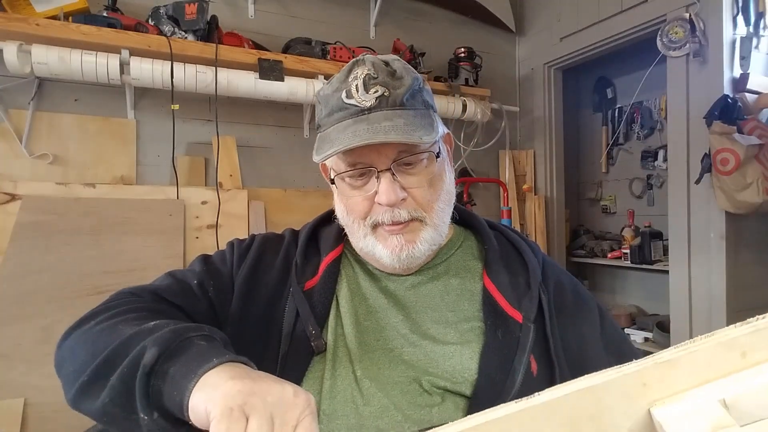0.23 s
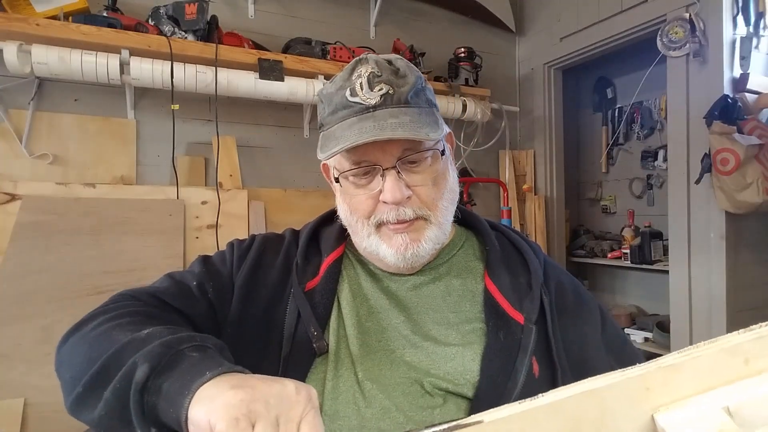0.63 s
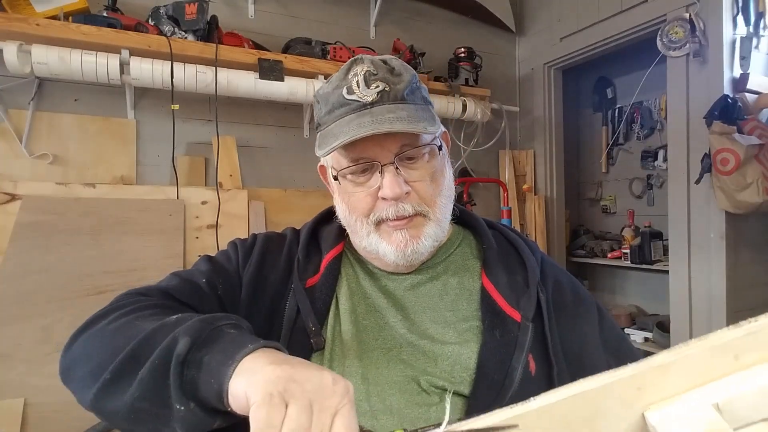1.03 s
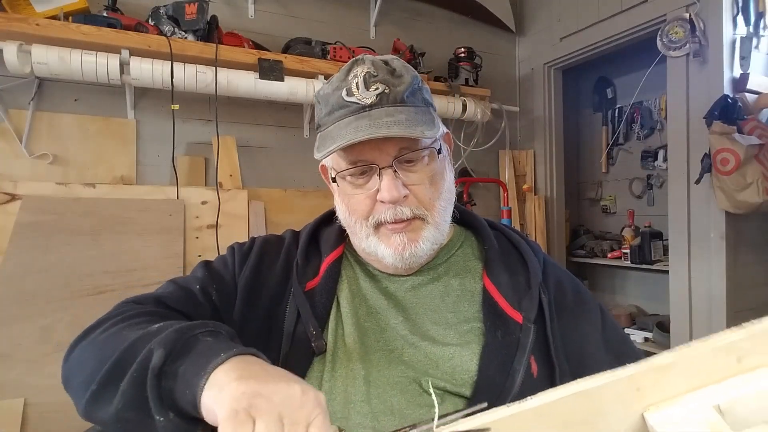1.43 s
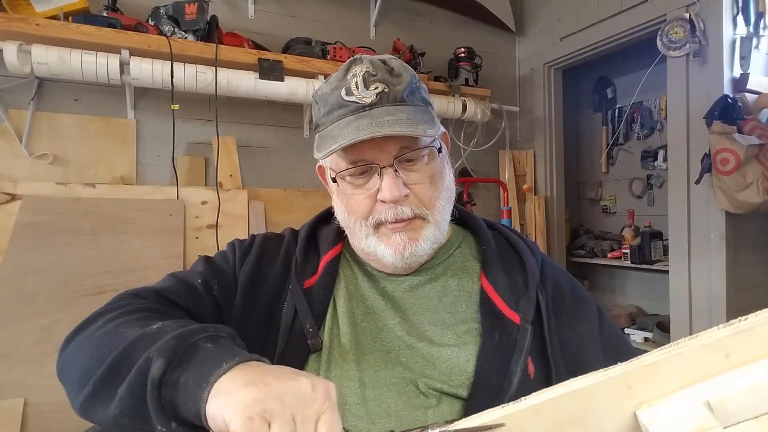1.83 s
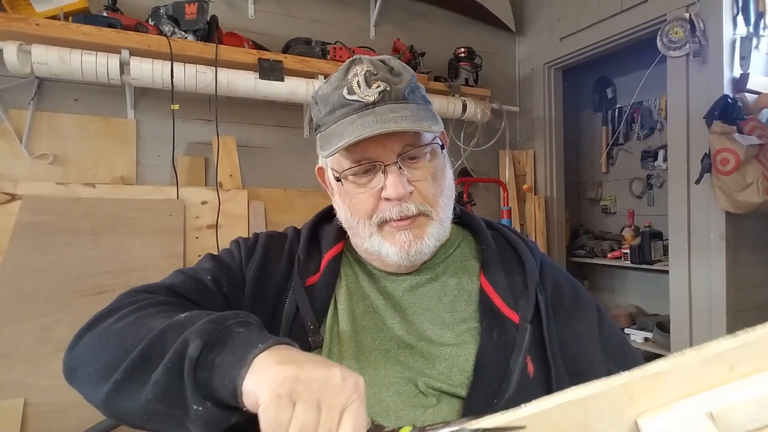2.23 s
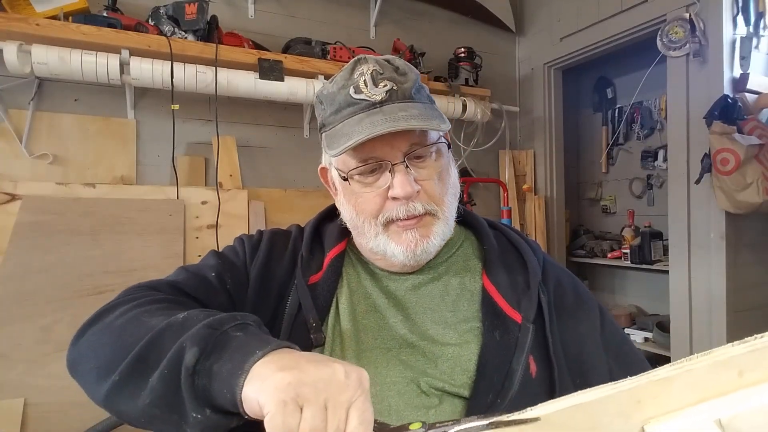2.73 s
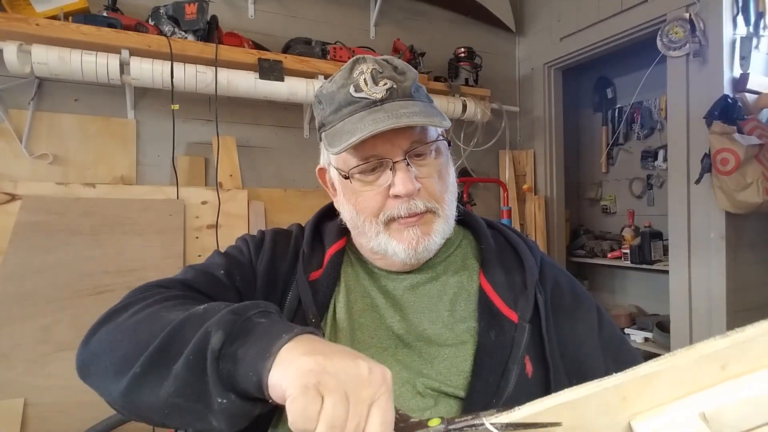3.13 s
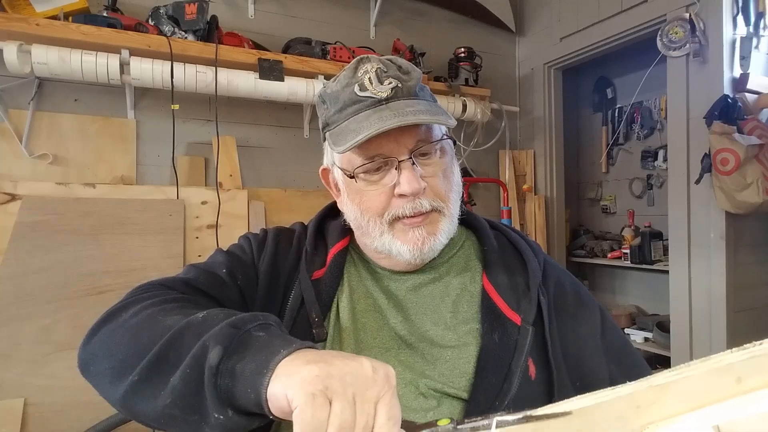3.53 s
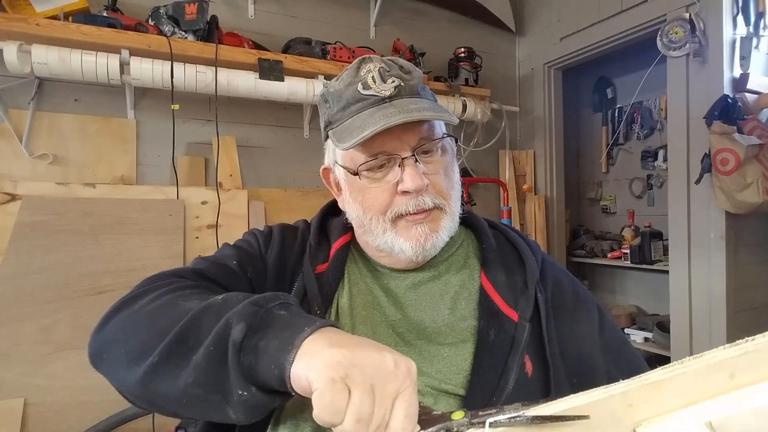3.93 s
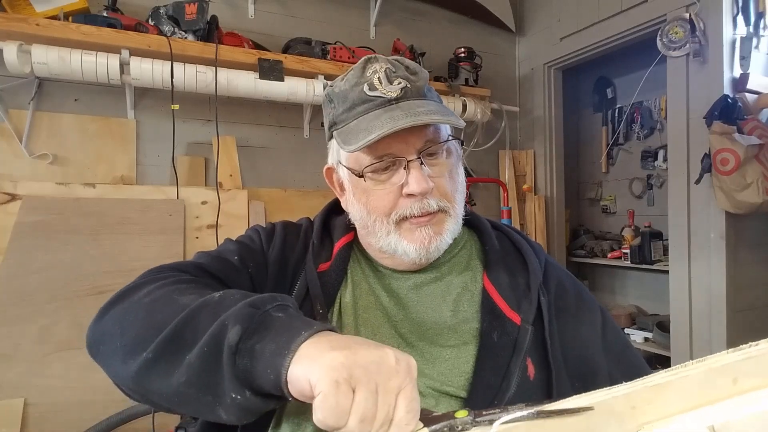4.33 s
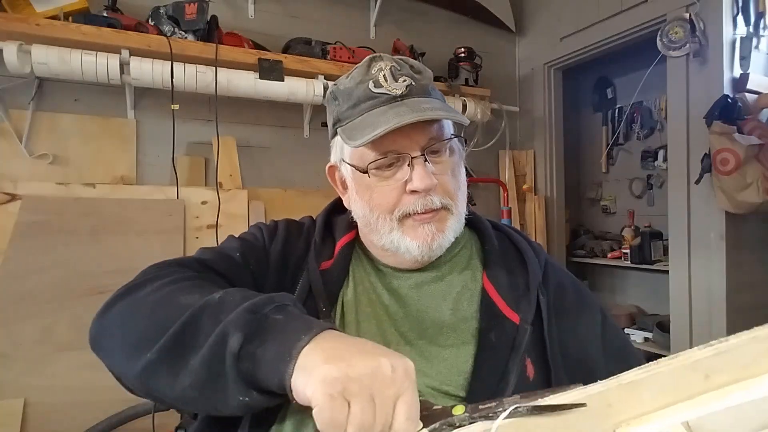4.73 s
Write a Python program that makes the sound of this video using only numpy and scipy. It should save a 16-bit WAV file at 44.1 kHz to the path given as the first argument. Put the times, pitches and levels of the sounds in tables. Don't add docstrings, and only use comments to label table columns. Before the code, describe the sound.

Scissors chew through stiff sandpaper on a wooden board, close to a small camera microphone. Dry, gritty cracks come in uneven clusters, each jolting the board with a short hollow knock. Faint grains scrape between bites, loose paper twangs briefly, blade edges click. After a quieter patch the cutting grows busier and brighter towards the end. A small workshop answers with a short tail over very faint hush.

```python
import sys
import numpy as np
from scipy import signal
from scipy.fft import rfft, irfft, next_fast_len
from scipy.io import wavfile
from scipy.ndimage import uniform_filter1d

SR = 44100
rng = np.random.default_rng(int(sys.argv[2]) if len(sys.argv) > 2 else 0)


def volts_from_db(level):
    exponent = np.asarray(level, float) / 20
    return 10 ** exponent


def unload_wav(signal):
    wavfile.write(
        sys.argv[1],
        SR,
        np.round(np.clip(np.atleast_2d(signal).T, -1, 1) * 32767).astype(np.int16),
    )


N = 219110


def evened(x):
    return x / np.sqrt(np.mean(x ** 2) + 1e-20)


def read(points, hz):
    f, value = np.transpose(points)
    return np.interp(np.log(hz + 1), np.log(f + 1), value)


def add(mix, s, sound):
    part = mix[..., round(s * SR):][..., :sound.shape[-1]]
    part += sound[..., :part.shape[-1]]


def colour(x, points):
    size = next_fast_len(x.shape[-1])
    gain = volts_from_db(read(points, np.fft.rfftfreq(size, 1 / SR)))
    return irfft(rfft(x, size) * gain, size)[..., :x.shape[-1]]


# frequency in Hz, level in dB per Hz.
HUSH_SPECTRUM = [(12, -50), (20, 2), (65, 1.5), (244, 1), (1210, -50), (1390, -69), (2120, -16.5),
                 (12800, -25.5), (15200, -13), (16500, -39)]


def hush(level_db=-63.5, sway_db=1.1):
    shared, own = rng.standard_normal(N), rng.standard_normal((2, N))
    sway = evened(uniform_filter1d(uniform_filter1d(shared, size=5000), size=3000))
    return volts_from_db(level_db + sway_db * sway) * evened(colour(shared + 0.59 * own, HUSH_SPECTRUM))


# frequency in Hz, decay time by 60 dB in seconds.
ROOM_DECAY = [(500, 0.5), (1500, 0.44), (4000, 0.36), (9000, 0.34), (16000, 0.32)]


def room(x, early_db=-18.0, late_db=-3.5):
    taps = np.zeros((len(x), 2, 24000))
    at = np.arange(200, 23900, 12) + rng.integers(0, 12, (len(x), 2, 1975))
    np.put_along_axis(taps, at, rng.choice([-1., 1.], at.shape), 2)
    hz, t, z = signal.stft(taps, SR, nperseg=256)
    decay = volts_from_db(-60 * t / read(ROOM_DECAY, hz)[:, None])
    tail = signal.istft(z * decay, SR, nperseg=256)[1]
    tail *= volts_from_db(late_db) / np.linalg.norm(tail[0, 0])

    echoes = rng.integers(30, 700, (len(x), 2, 8))
    early = np.zeros_like(tail)
    np.put_along_axis(early, echoes, volts_from_db(early_db) * rng.uniform(-2.96, 1, echoes.shape), 2)

    wet = signal.fftconvolve(x[:, None], tail + early, axes=2)[..., :N].sum(0)
    lowpass = signal.butter(1, 1100., fs=SR, output="sos")
    return wet + 0.43 * signal.sosfilt(lowpass, wet[::-1] - wet)


# start in seconds, length in seconds, scrape in the air in dB, scrape in the board in dB.
CRUNCHES = [(0, 0.012, -27.5, -29.5), (0.122, 0.039, -37, -46), (0.43, 0.051, -34, -40),
            (0.536, 0.013, -13.5, -23), (0.884, 0.032, -25.5, -48), (1.627, 0.051, -34.5, -30.5),
            (1.811, 0.015, -19.5, -30), (1.869, 0.078, -22, -30), (1.991, 0.025, -21, -25.5),
            (2.251, .036, -32.5, -38.5), (2.634, 0.04, -18.5, -29.5), (2.71, 0.024, -26, -30.5),
            (2.816, 0.014, -14, -46), (2.864, 0.05, -27.5, -71), (3.393, 0.068, -32, -35.5),
            (3.529, 0.012, -23.5, -31), (3.62, 0.013, -18, -38), (3.765, 0.049, -27.5, -32.5),
            (3.872, 0.032, -35.5, -40), (4.108, 0.028, -37, -60), (4.567, 0.044, -67, -39.5)]
# start in seconds, scrape in the air in dB, scrape in the board in dB.
DRAGS = [(0.364, -42.5, -49), (0.838, -33.5, -44), (0.901, -43, -36.5), (1.152, -44.5, -44.5),
         (1.218, -43.5, -43), (1.385, -42, -52), (1.444, -39.5, -40.5), (1.576, -57, -50),
         (1.917, -39, -43), (2.138, -41.5, -48), (2.468, -52.5, -51), (2.996, -43, -46), (3.082, -37, -41),
         (3.446, -40.5, -42.5), (4.178, -46, -44), (4.357, -31.5, -37), (4.681, -33, -35),
         (4.742, -37.5, -72)]
# frequency in Hz, level in dB per Hz.
PAPER_SPECTRUM = [(300, -7.5), (900, 1.5), (1900, 5), (3500, 2), (7300, -5.5), (9100, -6), (11000, -6),
                  (15500, -3)]
# frequency in Hz, level in dB, width in Hz.
BOARD_MODES = [(226, -12, 28), (288, -21, 170), (358, -27, 160), (456, -6, 72), (490, -6.5, 20),
               (608, -10, 30), (664, -12, 68), (894, -6, 34), (923, -2.5, 118), (1150, -12, 27),
               (1288, -0.5, 120), (1565, -2.5, 98), (2190, -35, 390)]
# time in seconds, brightness in dB per octave, ring of the blades in dB.
CROSSING = [(0, 0, 1), (.62, -.5, 2.5), (.8, -4.5, 13.5), (.95, 2, 1.5), (1.3, -2.5, -0.5), (1.47, -4, -18),
            (1.62, 1, 0.5), (1.9, 1, 9.5), (2.2, -1.5, 4), (2.7, 1.5, 5), (3.1, -4, 3.5), (3.4, 1.5, 7),
            (3.6, 1, 8.5), (3.8, -2.5, 3.5), (4.15, 0.3, -1.5), (4.36, 3.5, 11), (4.57, -2, 3.5),
            (4.77, 4.5, 9.5)]


def grind(grains_per_s=8000.0, size_db=4.5, clump_db=4.5, drag_s=0.11, follows=0.69, split_hz=3500):
    t, push = np.arange(N) / SR, np.zeros((2, N))
    drags = [(s, drag_s, air_db, board_db) for s, air_db, board_db in DRAGS]
    for s, length, air_db, board_db in CRUNCHES + drags:
        u = np.arange(0, 1, 1 / (length * SR))
        add(push, s, volts_from_db([[air_db], [board_db]]) * np.sin(np.pi * u ** 0.5) ** 2.56)

    clumps = volts_from_db(clump_db * evened(uniform_filter1d(rng.standard_normal(N), size=150)))
    hit = rng.random(N) < grains_per_s / SR
    size, sign = rng.exponential(1, N), rng.choice([-1., 1.], N)
    grains = evened(hit * sign * volts_from_db(size_db * np.minimum(size, 3)) * clumps)

    ring_t = t[:3000]
    body = sum(volts_from_db(db - 34.0 * width * ring_t) * np.sin(2 * np.pi * f * ring_t)
               for f, db, width in BOARD_MODES)
    shaken = signal.oaconvolve(grains * push[1], body / np.linalg.norm(body))[:N]

    air = evened(colour(grains, PAPER_SPECTRUM))
    top = signal.sosfilt(signal.butter(1, split_hz, "high", fs=SR, output="sos"), air)
    bright = volts_from_db(follows * np.interp(t, *np.transpose(CROSSING)[:2]))
    return push[0] * (top * bright + (air - top) / bright) + shaken


# start in seconds, peak in dB, pitch in Hz.
GRIT = [(.8365, -39, 6160), (1.1154, -50, 8340), (1.1209, -34, 9100), (1.152, -34, 3150),
        (2.112, -40, 7500), (2.2952, -32, 9500), (3.025, -42, 4560), (3.0944, -41, 7880),
        (3.2326, -49, 4540), (3.299, -34, 7640), (3.4905, -32, 11500), (3.503, -27, 4000),
        (3.7535, -33, 6910), (3.7763, -30, 4000), (4.0492, -48, 5800), (4.096, -32, 7500),
        (4.2832, -38, 5410), (4.37, -9.5, 5630), (4.4515, -16, 6200), (4.6, -40, 7000), (4.935, -40, 4540)]
# start in seconds, peak in dB, pitch in Hz.
TWANGS = [(.001, -18, 3800), (.037, -43, 1500), (.13, -31, 1770), (0.205, -30, 1300), (.204, -36, 466),
          (0.515, -25, 2580), (0.543, -17, 2390), (.615, -29, 2280), (0.636, -17, 1440), (0.64, -20, 1070),
          (0.782, -32, 2500), (.853, -10, 1980), (.878, -27, 384), (0.888, -20, 1920), (1.234, -28, 1310),
          (1.255, -46, 1290), (1.277, -30, 1240), (1.398, -25, 1480), (1.433, -36, 1500), (1.473, -41, 503),
          (1.816, -31, 1360), (1.874, -28, 1000), (2.017, -11, 960), (2.175, -25, 900),
          (2.238, -11.5, 2050), (2.721, -23, 2010), (2.82, -11, 1900), (3.364, -27, 890),
          (3.493, -37, 1500), (3.503, -20, 1570), (3.77, -25, 1820), (4.56, -25, 1820), (4.67, -5.5, 2250),
          (4.683, -25, 2300), (4.703, -16, 2060), (4.72, -15, 483), (4.721, -7, 2160), (4.78, -37, 900),
          (4.916, -26, 2650), (4.936, -28.5, 437)]


def pings(twang_cycles=10, grit_cycles=18):
    strips = [(*row, twang_cycles) for row in TWANGS]
    return strips + [(*row, grit_cycles) for row in GRIT]


def ping(db, hz, cycles, overtone=2.07, overtone_db=-11.5):
    turns = hz * np.arange(1800) / SR
    tone = np.sin(2 * np.pi * turns)
    if overtone * hz < 16000:
        tone += volts_from_db(overtone_db) * np.sin(2 * np.pi * overtone * turns)
    return volts_from_db(db - 60 * turns / cycles) * (1 - np.exp(-turns / 0.5)) * tone


def knock(deep_db, deep_hz, hard_db, hard_hz, deep_t60=0.04, hard_cycles=40.0, rest_db=-17.5, rise_s=0.0014):
    f, mode_db, width = np.transpose(BOARD_MODES)[:, :, None]
    t = np.arange(3600) / SR
    phase, spread = rng.random((2, len(f), 1))
    rest = volts_from_db(mode_db + 8.6 * (spread + 1.0) - 23.4 * width * t) * np.sin(2 * np.pi * (f * t + phase))
    deep = volts_from_db(deep_db - 60 * t / deep_t60) * np.sin(2 * np.pi * (deep_hz * t + rng.random()))
    hard_fade = volts_from_db(hard_db - 60 * t * hard_hz / hard_cycles)
    hard = hard_fade * np.sin(2 * np.pi * (hard_hz * t + rng.random()))
    hard *= 1 + 0.58 * np.cos(2 * np.pi * 0.22 * hard_hz * (t - rise_s))
    ring = deep + hard + volts_from_db(rest_db + (deep_db + hard_db) / 2) * rest.sum(0)
    return ring * (1 - np.exp(-(t / rise_s) ** 2))


# start in seconds, deep knock in dB, hard
# knock in dB.
SHOVES = [(.003, -28.5, -11), (.437, -25.5, -35), (.45, -32, -31), (.541, -11, -17), (.89, -20.5, -20.5),
          (1.187, -28.5, -46), (1.604, -30.5, -56), (1.7, -33, -56), (1.817, -12.5, -18),
          (1.896, -7.5, -11), (1.996, -15, -14), (2.235, -34, -24.5), (2.657, -15.5, -15),
          (2.649, -36, -34), (3.025, -31, -33.5), (3.433, -25, -53), (3.501, -21.5, -22),
          (3.537, -21.5, -12), (3.55, -24, -27), (4.201, -56, -32), (4.212, -31.5, -28.5)]
# time in seconds, deep mode in Hz, hard mode in Hz.
GRIP = [(0, 410, 1150), (.037, 396, 1100), (.437, 398, 1210), (.515, 446, 950), (.541, 438, 1180),
        (0.613, 446, 920), (.637, 470, 1220), (.784, 450, 1270), (.854, 436, 1240), (.88, 398, 1250),
        (.959, 355, 1230), (1.187, 490, 870), (1.408, 403, 1240), (1.494, 467, 880), (1.6, 407, 1150),
        (1.645, 440, 1130), (1.664, 364, 1130), (1.723, 417, 1150), (1.817, 430, 1190), (1.896, 470, 1320),
        (1.919, 470, 1010), (1.954, 460, 1220), (1.996, 491, 1140), (2.236, 444, 890), (2.568, 492, 1300),
        (2.646, 543, 1150), (2.658, 490, 868), (2.721, 500, 1180), (2.82, 485, 887), (2.866, 630, 894),
        (3.025, 498, 886), (3.126, 610, 910), (3.335, 524, 860), (3.41, 618, 867), (3.498, 630, 884),
        (3.515, 492, 890), (3.537, 519, 866), (3.55, 603, 850), (3.628, 685, 863), (3.677, 467, 824),
        (3.77, 490, 832), (3.867, 455, 860), (4.2, 420, 850), (4.296, 540, 832), (4.37, 619, 855),
        (4.44, 458, 888), (4.56, 476, 890), (4.67, 450, 920), (4.69, 484, 830), (4.702, 463, 842),
        (4.72, 410, 800), (4.765, 600, 1150), (4.918, 457, 847)]
# start in seconds, crack in dB, length in ms, deep knock in dB, hard knock in dB.
FIRST_BITES = [(.0019, -21.5, 8.2, -13.5, -22), (0.0375, -26, 8.3, -22, -46), (0.515, -19, 5.3, -26, -19.5),
               (0.6077, -34, 6.3, -23, -24), (.616, -22.5, 1.8, -22.5, -22.5), (0.6376, -14, 3.1, -21, -6),
               (0.7842, -22.5, 1.9, -31, -32), (0.8537, -21, 2.5, -43, -21),
               (0.8721, -25.5, 8.3, -27.5, -31), (0.9592, -26, 8.9, -19, -25), (1.4084, -37, 4.8, -26, -41),
               (1.4201, -29.5, 7.5, -53, -35), (1.4675, -41, 1.3, -50, -50), (1.4939, -35, 6.7, -26.5, -34),
               (1.5942, -27.5, 7.5, -27.5, -39), (1.646, -21.5, 2.4, -28, -29),
               (1.6648, -22, 4.4, -18.5, -47), (1.7226, -16, 5.2, -17, -28),
               (1.9186, -20.5, 6.7, -23, -14.5), (1.954, -26, 3.1, -21, -19), (2.5675, -20, 0.66, -30, -36),
               (2.6457, -17.5, 4.9, -7.5, -10), (2.7212, -9, 1.3, -18.5, -19.5)]
# start in seconds, crack in dB, deep knock in dB, hard knock in dB.
SECOND_BITES = [(2.8044, -15.5, -27, -27), (2.8196, -11, -14.5, -21.5), (2.8657, -9, -19.5, -20.5),
                (3.1045, -27.5, -42, -47), (3.126, -20.5, -27, -28.5), (3.3352, -20.5, -33, -34),
                (3.3859, -25, -37, -35), (3.401, -20.5, -30, -26), (3.4116, -16.5, -18.5, -19.5),
                (3.4566, -28, -28, -45), (3.4851, -18.5, -20, -24), (3.5162, -6.5, -17, -19),
                (3.6289, -12.5, -14.5, -13), (3.6781, -30, -16, -23.5), (3.7707, -19.5, -16.5, -41),
                (3.8669, -27, -51, -26), (4.1149, -24.5, -37, -34.5), (4.175, -15, -50, -28.5),
                (4.2969, -15, -17.5, -15), (4.3697, -6, -25, -22), (4.3989, -19, -39, -22.5),
                (4.439, -16, -36, -21.5), (4.5597, -15, -33, -20.5), (4.6699, -8.5, -22.5, -31),
                (4.6791, -11.5, -25, -15.5), (4.6916, -12, -16, -17), (4.7026, -19, -17.5, -13.5),
                (4.7642, -16, -29, -21), (4.9182, -21.5, -33, -37)]


def jolts(lead_s=0.0012):
    bites = [(max(s - lead_s, 0), deep, hard) for s, *_, deep, hard in FIRST_BITES + SECOND_BITES]
    s, deep_db, hard_db = np.transpose(bites + SHOVES)
    at, deep_hz, hard_hz = np.transpose(GRIP)
    return zip(s, deep_db, np.interp(s, at, deep_hz), hard_db, np.interp(s, at, hard_hz))


def snap(db, tilt_db, blades_db, length_ms, blades_hz=7260, blades_octaves=0.43, lumps_db=4.0,
         spread_ms=0.33, far_share=0.31):
    t = np.arange(1024) / SR - .002
    u = np.maximum(t, 0) / ((max(length_ms, .2) + spread_ms) / 1000)
    burst = rfft(rng.standard_normal(len(t)) * u ** 2 * np.exp(-5.5 * u))
    f = np.fft.rfftfreq(len(t), 1 / SR) + 1
    octaves = np.log2(f / blades_hz)
    tilt = np.clip(tilt_db, -10, 6) * np.maximum(octaves, -2)
    steel = blades_db * np.exp(-(octaves / blades_octaves) ** 2)
    shape = volts_from_db(read(PAPER_SPECTRUM, f) + tilt + steel)

    rough = uniform_filter1d(uniform_filter1d(rng.standard_normal(len(f)), size=24), size=14)
    lumps = volts_from_db(lumps_db * evened(rough))
    size = abs(burst) / np.sqrt(np.mean(abs(burst) ** 2))
    near = irfft(burst / size ** 0.13 * shape * lumps)
    around = irfft(burst / size * shape * lumps ** far_share)
    peak = np.sqrt(2 * uniform_filter1d(near ** 2, 44).max())
    return volts_from_db(db) * np.array([near, around]) / peak


# start in seconds, peak in dB, length in ms.
CLICKS = [(.3993, -34, 2.2), (.4091, -28, 3.2), (.4155, -31, 1.3), (.9449, -22, 4.1), (2.0476, -20, 0.56),
          (2.2664, -12, 2.1), (2.2952, -38, .56), (2.4809, -25.5, 2), (2.6036, -23.5, 1.8),
          (2.626, -25, 2.2), (2.6552, -14, 2.3), (2.8498, -5, 0.81), (4.3039, -24, 0.86),
          (4.4224, -12.5, 2.3), (4.4634, -22.5, 2.1), (4.371, -27, 1.7), (4.64, -35, 1.1), (4.82, -43, 1.2)]
# start in seconds, peak in dB, length in ms.
FOLDS = [(1.2539, -31.5, 4), (1.433, -25.5, 1.4), (1.676, -45, 3.6), (2.0142, -14, 5.9),
         (2.1451, -29.5, 5.9), (2.2382, -14, 3.4), (2.5602, -30, 3.4), (3.1163, -32, 9.4),
         (3.8815, -35, 0.88), (4.5864, -29, 4.1), (4.7102, -13.5, 2.3), (4.934, -30, 2.1)]
# start in seconds, peak in dB, length in ms, ring of the blades in
# dB.
CRACKS = [(0.203, -25.5, 3.4, -8), (0.369, -30.5, 2.6, -10), (0.3922, -34, 4.3, -22),
          (0.4426, -23.5, 1.44, 5), (0.917, -20.5, 5.1, 8), (0.9319, -20.5, 9.6, -23),
          (1.2003, -33.5, 3.2, 13), (1.2334, -32, 4.6, 12), (1.5566, -29.5, 1.6, 7),
          (1.5848, -31.5, 9.9, -2), (1.6294, -30, 1.2, -13), (1.64, -28, 1.7, 3), (1.798, -21, 11, -1),
          (1.8839, -14, 1.1, -4), (1.892, -7.5, 2.7, -10), (2.224, -34.5, 8.9, 9), (2.274, -32, 1.9, -7),
          (2.4894, -34, 1.3, 6), (2.6336, -14, 1.9, -6), (3.3228, -23, 0.82, 0), (3.4051, -20, 5.2, -18),
          (3.487, -24, 7.2, -4), (3.537, -14, 2.1, -2), (3.9302, -33.5, 1.4, 10), (4.073, -36, 3.5, 17),
          (4.1399, -16, 2.5, 7.5), (4.3312, -16.5, 1.1, -1), (4.4515, -25.5, 7, -12),
          (4.7872, -27, 4.3, -19)]


def cracks(ring_scatter_db=6.5, length_scatter=0.13):
    kinds = [(FIRST_BITES, (-0.44, -0.11)), (CLICKS, (12, 0.76)), (FOLDS, (-3, -1.5))]
    rows = [(s, db, *kind, ms) for table, kind in kinds for s, db, ms, *_ in table]
    rows += [(s, db, 0.47, 1.7, 1.53) for s, db, *_ in SECOND_BITES]
    rows += [(s, db, 0.22, ring_db, ms) for s, db, ms, ring_db in CRACKS]
    ring, stretch = rng.standard_normal((len(rows), 2)).T
    s, db, tilt_db, blades_db, ms = np.array(rows).T
    at, bright_db, ring_db = np.transpose(CROSSING)
    tilt_db = tilt_db + np.interp(s, at, bright_db)
    blades_db = blades_db + np.interp(s, at, ring_db) + ring_scatter_db * ring
    return zip(s, db, tilt_db, blades_db, ms * np.exp(length_scatter * stretch))


def scene(right_lag_s=0.0001668, drift_db_per_s=0.48):
    direct, spots = np.zeros((2, N)), np.zeros((4, N))
    for k, (s, *crack) in enumerate(cracks()):
        near, around = snap(*crack)
        start = max(s - .002, 0)
        right_start = max(s - .002 + 0.00026 * rng.uniform(-1, 1), 0)
        other_side = 0.22 * near + 1.03 * around
        add(direct[0], start, near)
        add(direct[1], right_start, volts_from_db(2.0 - drift_db_per_s * s) * other_side)
        add(spots[k % 4], start, around)

    for k, (s, *jolt) in enumerate(jolts()):
        ring = knock(*jolt)
        add(direct[0], s, ring)
        add(direct[1], s + 0.000044, ring)
        blow = volts_from_db(4.0 - 3850.0 * np.arange(len(ring)) / SR) * ring
        add(spots[k % 4], s, blow)

    for k, (s, db, hz, cycles) in enumerate(pings()):
        tone = ping(db, hz, cycles)
        add(direct, s, volts_from_db([[0], [1.0 - drift_db_per_s * s]]) * tone)
        add(spots[k % 4], s, tone)

    scrape = grind()
    direct += scrape
    turn = np.pi * np.arange(N) / SR * 7
    spots[:2] += scrape * [np.cos(turn), np.sin(turn)]

    late = np.exp(-2j * np.pi * np.fft.rfftfreq(N, 1 / SR) * right_lag_s)
    direct[1] = irfft(rfft(direct[1]) * late, N)
    return direct + room(spots)


def low_pass(x):
    return signal.sosfilt(signal.butter(12, 16970, fs=SR, output="sos"), x)


# frequency in Hz, level in dB.
MIC_RESPONSE = [(30, -25.5), (120, -12), (250, -5.5), (380, -2.5), (15600, -3), (15900, -18), (16900, -39)]
# frequency in Hz, level in dB.
CASE_DIP = [(8500, 0), (9350, -2), (10100, 0)]
# frequency in Hz, left over right in dB.
PORT_BALANCE = [(60, -5), (130, 1), (290, -0.5), (640, 2), (1410, 0.5), (3100, 3), (6820, 2), (15000, 0)]


def record(dry):
    heard = colour(colour(dry, MIC_RESPONSE), CASE_DIP)
    left = colour(heard[0], [(f, db / 2) for f, db in PORT_BALANCE])
    right = colour(heard[1], [(f, -db / 2) for f, db in PORT_BALANCE])
    mix = np.array([left, right]) + hush()
    return low_pass(mix)


dry = scene()
out = record(dry)
unload_wav(out)
```